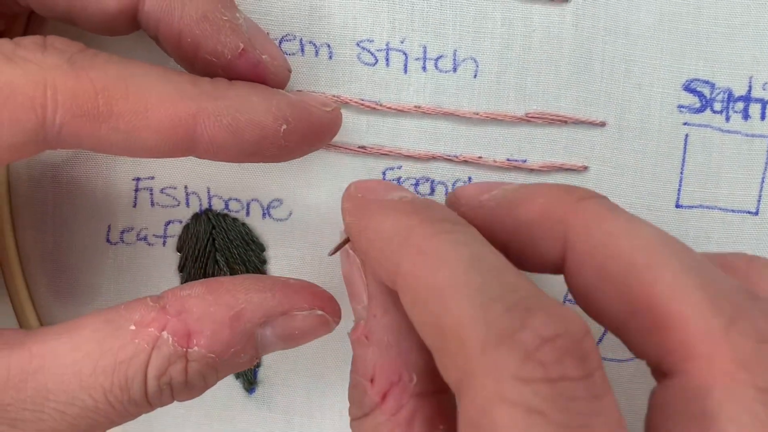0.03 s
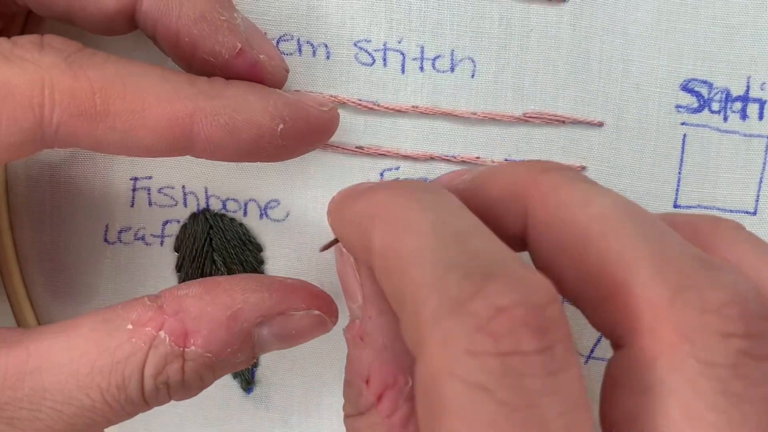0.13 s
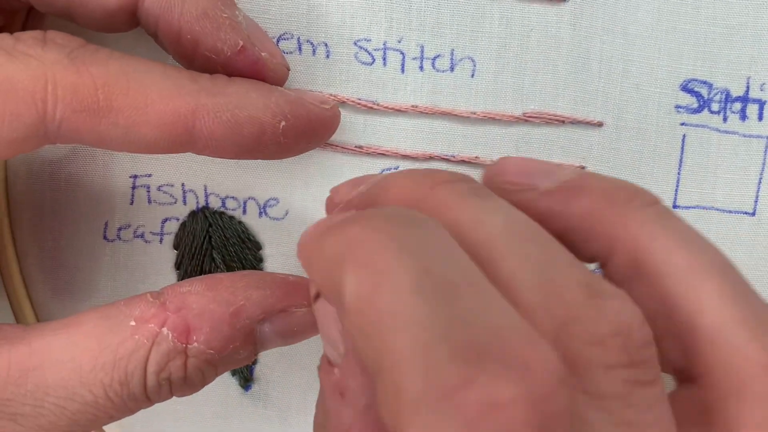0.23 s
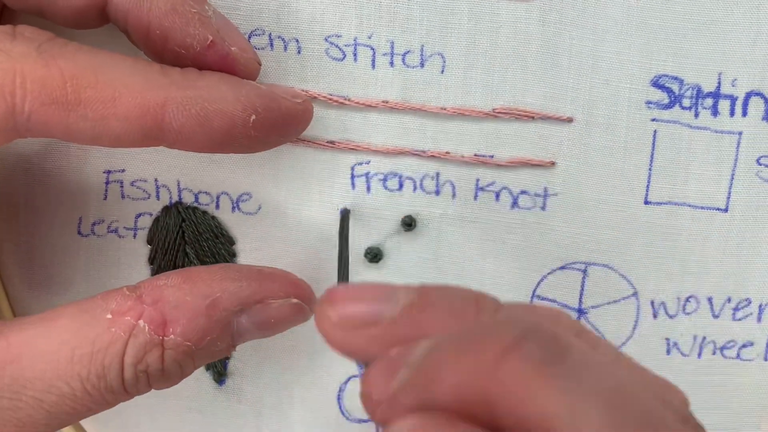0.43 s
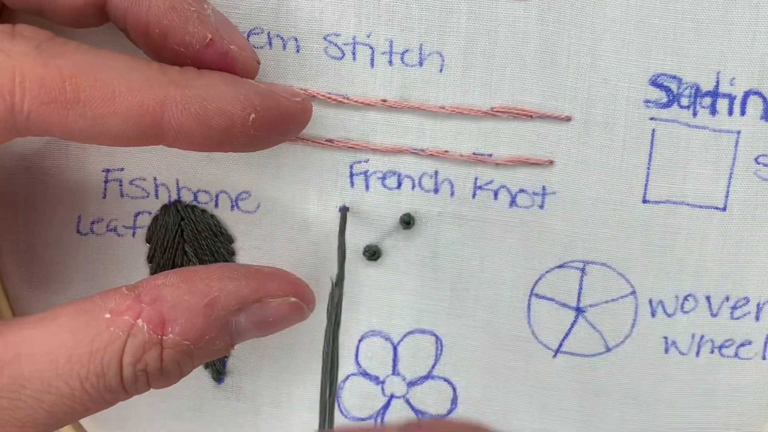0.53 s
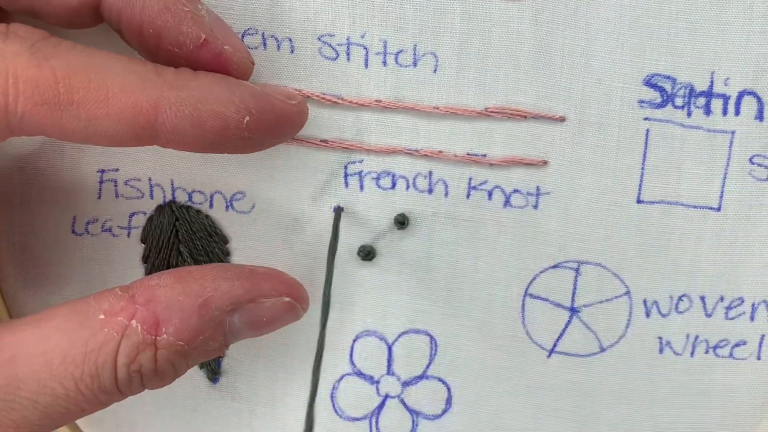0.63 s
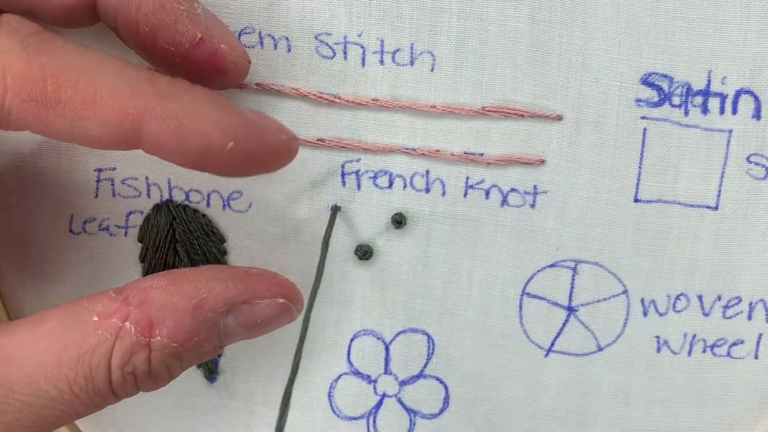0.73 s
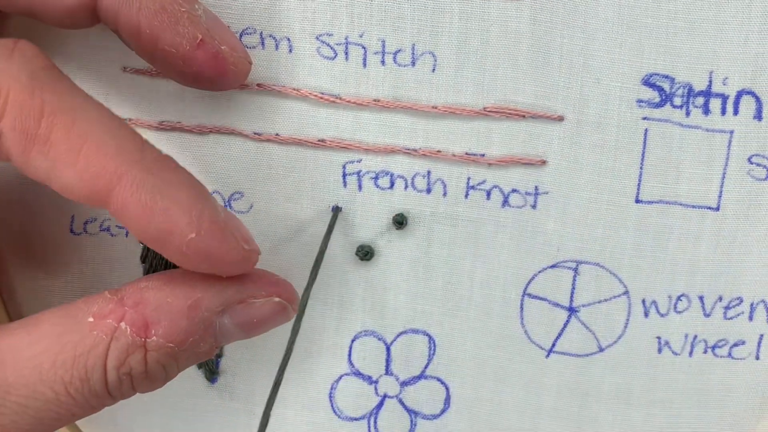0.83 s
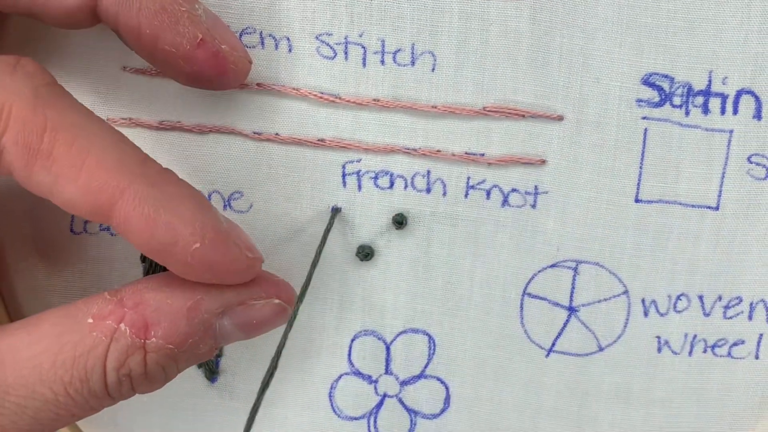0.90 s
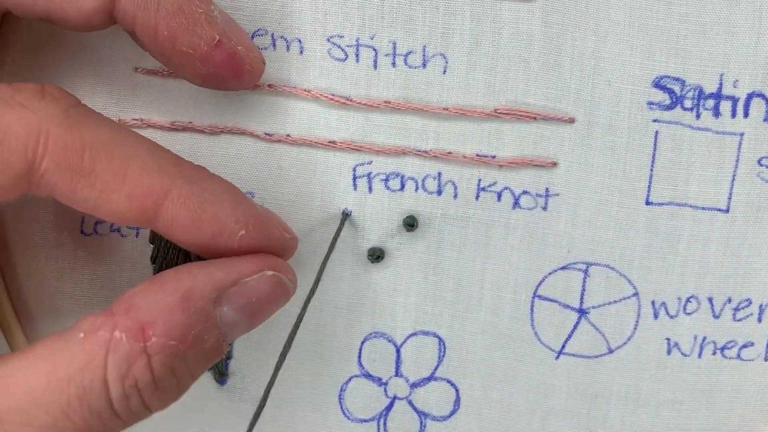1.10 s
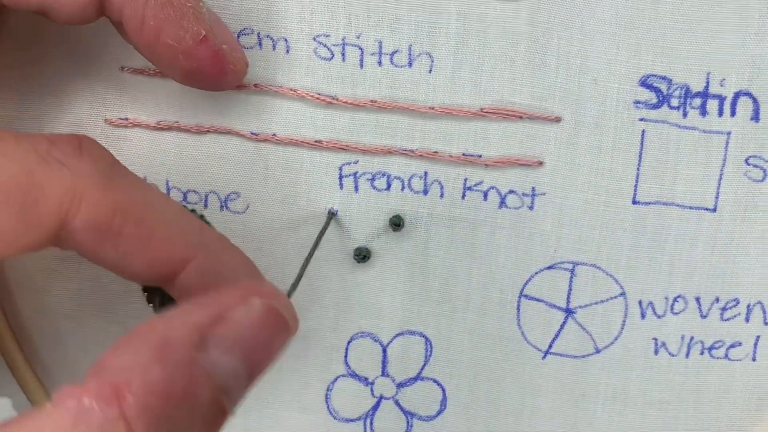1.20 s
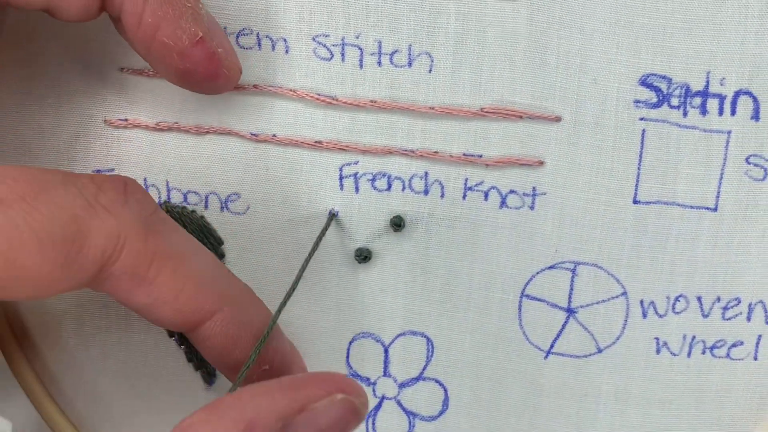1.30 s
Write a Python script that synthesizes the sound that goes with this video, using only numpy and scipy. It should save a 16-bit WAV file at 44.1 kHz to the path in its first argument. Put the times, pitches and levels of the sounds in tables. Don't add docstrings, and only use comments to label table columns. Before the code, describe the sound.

Close up indoors, taut hooped fabric gives a dull prick, a sharp hollow pop and a softer thump as needle and thread pass, then a gentle fibrous drag, near silence, and barely audible finger touches.

```python
import sys
import numpy as np
from scipy import signal
from scipy.fft import rfft, irfft, next_fast_len
from scipy.io import wavfile
from scipy.ndimage import uniform_filter1d, map_coordinates

SR = 44100
rng = np.random.default_rng(int(sys.argv[2]) if len(sys.argv) > 2 else 0)


def volts_from_decibels(level):
    exponent = np.asarray(level, float) / 20
    return 10 ** exponent


def bounce(signal):
    frames = np.transpose(np.atleast_2d(signal))
    limited = np.clip(frames, -1, 1)
    pcm = np.round(limited * 32767).astype(np.int16)
    wavfile.write(sys.argv[1], SR, pcm)


N = 59535


def unit(x):
    return x / np.sqrt(np.mean(x ** 2) + 1e-20)


def along(points, hz):
    f, value = np.transpose(points)
    return np.interp(np.log(hz + 1), np.log(f + 1), value)


def filtered(x, response):
    m = next_fast_len(N + SR // 2)
    hz = np.fft.rfftfreq(m, 1 / SR)
    return irfft(rfft(x, m) * response(hz), m)[..., :N]


def resonances(table, f, signs=(1, -1) * 4):
    total = 0
    for sign, (center, width, db) in zip(signs, table):
        total = total + sign * volts_from_decibels(db) * 1j * f * width / (center ** 2 - f ** 2 + 1j * f * width)
    return total


def wobble(rate):
    knots = rng.standard_normal(int(N * rate / SR) + 4)
    return map_coordinates(knots, [np.arange(N) * rate / SR])


# (frequency [Hz], level [dB per Hz])
AIR_TONE = [(30, -13), (55, -2), (150, -12), (400, -22), (800, -31), (3500, -34), (9000, -37.5),
            (15600, -39.5)]
AIR_DB = -69.5


def air():
    hiss = unit(filtered(rng.standard_normal((2, N)), lambda f: volts_from_decibels(along(AIR_TONE, f))))
    return volts_from_decibels(AIR_DB + 1.5 * wobble(13)) * hiss


# (frequency [Hz], time to fall 60 dB [s])
ROOM_DECAY = [(150, 0.3), (1000, 0.067), (8000, .12)]


def room(x):
    hz, t, z = signal.stft(rng.standard_normal((2, SR // 2)), SR, nperseg=256)
    fade = volts_from_decibels(-60 * t / along(ROOM_DECAY, hz)[:, None])
    tail = signal.istft(z * fade, SR, nperseg=256)[1]
    tail = tail / np.linalg.norm(tail[0])
    late = np.pad(x, (300, 0))
    return signal.fftconvolve(late[None], tail, axes=1)[:, :N]


def slips(per_s, spread_db):
    chance = rng.random((2, N))
    size = rng.exponential(size=(2, N))
    sign = rng.standard_normal((2, N))
    return unit((chance < per_s / SR) * volts_from_decibels(spread_db * size) * sign)


def patchy(pair):
    z = signal.stft(pair, nperseg=512)[2]
    field = uniform_filter1d(rng.standard_normal(z.shape[1:]), size=4, axis=0)
    field = uniform_filter1d(field, size=9, axis=1)
    patch_db = 1.94
    return signal.istft(z * volts_from_decibels(patch_db * unit(field)), nperseg=512)[1][:, :N]


# (frequency [Hz], width [Hz], level [dB])
HUM_MODES = [(80, 60, -12.5), (145, 65, -1.5), (215, 49, -1), (454, 98, -11.5)]
# (frequency [Hz], width [Hz], level [dB])
WEAVE_MODES = [(663, 100, 3.5), (995, 70, 4.5), (1560, 560, -4.5), (2226, 180, -19), (2780, 160, -21.5),
               (3553, 300, -15.5)]
# (frequency [Hz], level [dB per Hz])
FIBRE_TONE = [(2000, -13.5), (4700, -3), (5900, -9), (6900, -9.5), (8000, -14), (9000, -3), (11000, -16),
              (14500, -12)]
# (time [s], strength [dB], weave [dB], drum [dB])
NEEDLE_STROKES = [
    [(.1, -93.5, -1.5, -2), (.122, -86.5, 1, -5), (.13, -74, -8, -5), (.164, -67, -12.5, -10),
     (.182, -76, -8.5, 1), (.192, -62, -5, -7.5), (.209, -61.5, -8, -4), (.216, -78.5, -3, 1),
     (.27, -95.5, 4.5, 14.5)],
    [(.278, -76.5, 1.5, 3.5), (.288, -64, 0, 0.5), (.294, -47, 5.5, -0.5)],
    [(.302, -56.5, 10, -2.5), (.335, -56.5, -0.5, -1.5), (.365, -63.5, -0.5, -2), (.42, -73, 0, 2),
     (.435, -90, 11, 13), (.452, -86, 9, 13.5)],
]
# (time [s], strength [dB], weave [dB], drum [dB])
THREAD_STROKES = [
    [(.4585, -60.5, 3, -14), (.468, -63, 0, -12), (.49, -72, 3, 0), (.59, -68.5, -1.5, -0.5),
     (.7, -71.5, 0, -1), (.78, -71.5, 3, 1), (.855, -76.5, 4.5, 3), (.885, -87, 8.5, 5),
     (.97, -100, -27, -8)],
    [(1.07, -100, -6, 1), (1.1, -92, -4, -17), (1.118, -76.5, -7.5, -12), (1.15, -85.5, -3.5, -8.5),
     (1.228, -81.5, 0.5, -11.5), (1.24, -75, 1.5, -4.5), (1.268, -83.5, -4, -4), (1.29, -107, -8, -1.5),
     (1.34, -103, 2.5, -2)],
]
SLIPS_PER_S, SLIP_SPREAD_DB = 5000, 1
TUGS_PER_S, TUG_SPREAD_DB, TUG_SOFT_HZ = 980, -0.5, 756
HUM_DB, WEAVE_DB, HISS_DB, WAVER_DB = 26, 17, 8.5, 0.5
EDGE_S = 0.0018


def rubbing():
    fibre_slips = patchy(slips(SLIPS_PER_S, SLIP_SPREAD_DB))
    weave = unit(filtered(fibre_slips, lambda f: resonances(WEAVE_MODES, f)))
    tugs = slips(TUGS_PER_S, TUG_SPREAD_DB)
    hum = unit(filtered(tugs, lambda f: resonances(HUM_MODES, f) / (1 + 1j * f / TUG_SOFT_HZ) ** 2))
    noise = patchy(rng.standard_normal((2, N)))
    hiss = unit(filtered(noise, lambda f: volts_from_decibels(along(FIBRE_TONE, f))))

    t, out = np.arange(N) / SR, 0
    for stroke in NEEDLE_STROKES + THREAD_STROKES:
        s, strength_db, weave_db, drum_db = np.transpose(stroke)
        edge = np.clip(np.minimum(t - s[0], s[-1] - t) / EDGE_S + 1, 0, 1)
        strength = edge * volts_from_decibels(np.interp(t, s, strength_db))
        weave_gain = volts_from_decibels(np.interp(t, s, WEAVE_DB + weave_db))
        hum_gain = volts_from_decibels(np.interp(t, s, HUM_DB + drum_db))
        out = out + strength * (volts_from_decibels(HISS_DB) * hiss + weave_gain * weave + hum_gain * hum)
    return out * volts_from_decibels(WAVER_DB * wobble(40))


# (time [s], peak level [dB], sharpness [Hz], snap level [dB], tension [pitch ratio])
CLOTH_POPS = [
    (0.04, -56.5, 200, -87, 1.08),
    (0.2071, -16.5, 300, -64, 1.103),
    (0.2958, -2, 6000, -17, .98),
    (0.4568, -18.5, 580, -41.5, 1.15),
    (1.113, -54.5, 495, -71.5, 2.84),
    (1.2373, -54, 1280, -55, 1.67),
]
# (frequency [Hz], width [Hz], level [dB])
DRUM_MODES = [(127, 45.4, 1.5), (200, 150, -8.5), (406.7, 75, -8.5), (713, 190, -23), (943, 440, -22),
              (1600, 540, -25), (3490, 650, -26.5), (5250, 810, -32)]
DRUM_SIGNS = [1, -1, 1, 1, -1, -1, 1, -1]
SPREAD_CYCLES = 0.8


def pops():
    def late(f):
        return np.exp(-2j * np.pi * SPREAD_CYCLES * np.log((f + 30) / 20000))

    def snap_tone(f):
        return 1j * f / (2000 + 1j * f) / (1 + 1j * f / 11000) ** 2

    out, t = np.zeros(N), np.arange(SR // 50) / SR
    snap_fade_db = -60 * t / 0.0085
    for s, db, sharp_hz, snap_db, tension in CLOTH_POPS:
        def drum(f):
            ring = resonances(DRUM_MODES, f / tension, DRUM_SIGNS)
            return ring * late(f) / (1 + 1j * f / sharp_hz) ** 2

        kick, snap = np.zeros((2, N))
        start = round(s * SR)
        kick[start] = 1
        thump = filtered(kick, drum)
        snap[start:][:len(t)] = volts_from_decibels(snap_db + snap_fade_db) * rng.standard_normal(len(t))
        out += volts_from_decibels(db) * thump / np.abs(thump).max() + filtered(snap, snap_tone)
    return out


# (frequency [Hz], left over right [dB])
LEFT_OVER_RIGHT = [(60, -1.5), (200, -3), (400, -2.5), (900, -2), (2200, -4.5), (3800, -0.5)]
# (frequency [Hz], phase [radians])
LEFT_LEAD = [(0, -1), (700, 1.5), (1700, -1.5), (2700, 4.39), (3800, 1.415), (4823, 3.5), (15500, 18.5)]
LEAD_STEP = 0.2


def ports(pair, alike):
    def mix(hz):
        turn = np.arccos(np.clip(along(alike, hz), -1, 1)) / 2
        return np.array([np.cos(turn), np.sin(turn)])

    def balance(hz):
        lead = np.interp(hz, *np.transpose(LEFT_LEAD))
        phase = lead - LEAD_STEP * np.sin(2 * lead)
        half = volts_from_decibels(along(LEFT_OVER_RIGHT, hz) / 2) * np.exp(0.5j * phase)
        return np.array([half, 1 / half])

    mid, side = filtered(pair, mix)
    return filtered(np.array([mid + side, mid - side]), balance)


# (frequency [Hz], likeness [0 to 1])
CLOTH_ALIKE = [(60, 0.89), (250, 1), (700, 0.69), (1700, 0.25), (2700, 0.44), (4000, 0.91), (5000, 1)]
# (frequency [Hz], likeness [0 to 1])
AIR_LIKENESS = [(60, 0.7), (200, .7), (500, .1), (2800, 0.078), (4400, 0.87)]
ROOM_DB = -22


def scene():
    hits = pops()
    direct = np.array([hits, 0 * hits])
    near = direct + volts_from_decibels(ROOM_DB) * room(hits) + rubbing()
    return ports(near, CLOTH_ALIKE) + ports(air(), AIR_LIKENESS)


def band_limit(x):
    return signal.sosfilt(signal.butter(12, 16640, fs=SR, output="sos"), x)


LOW_CUT_HZ, TOP_HZ, OVER_TOP_DB = 30, 15750, -19.5


def record(dry):
    def band(f):
        low_cut = (1j * f / LOW_CUT_HZ / (1 + 1j * f / LOW_CUT_HZ)) ** 2
        return low_cut * np.where(f < TOP_HZ, 1, volts_from_decibels(OVER_TOP_DB))

    mix = filtered(dry, band)
    return band_limit(mix)


dry = scene()
out = record(dry)
bounce(out)
```